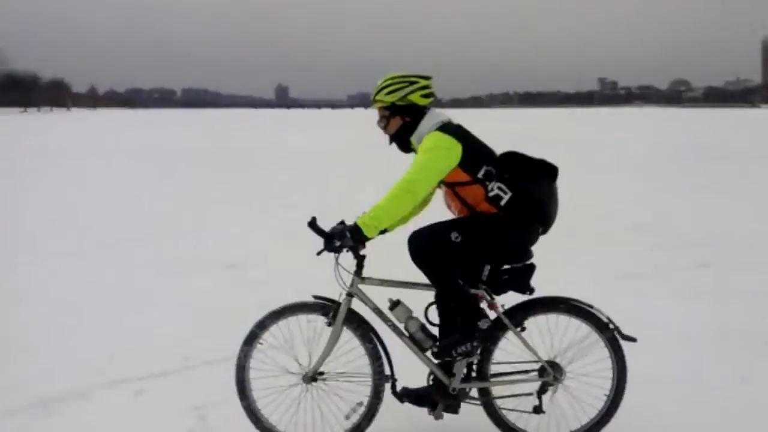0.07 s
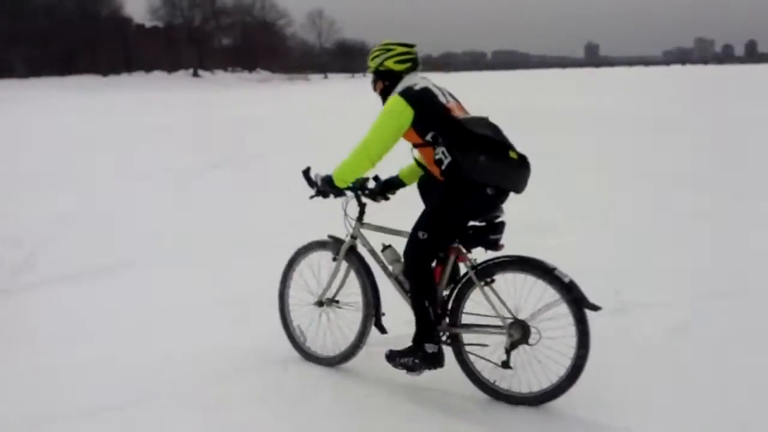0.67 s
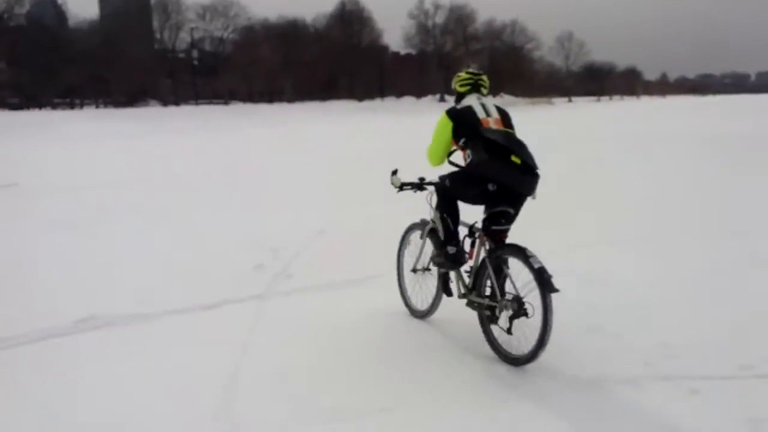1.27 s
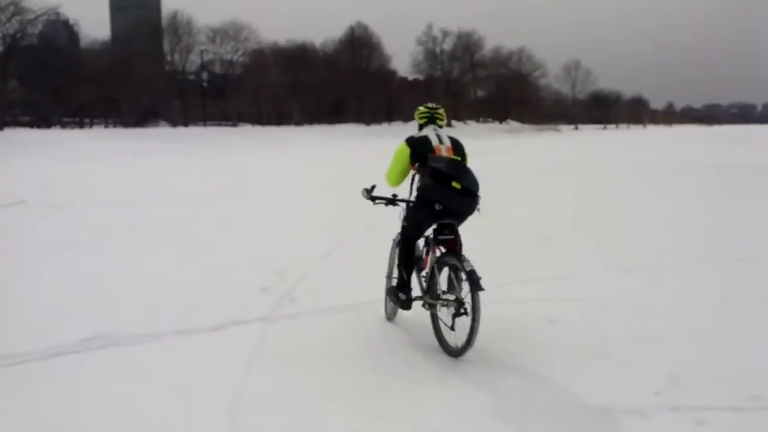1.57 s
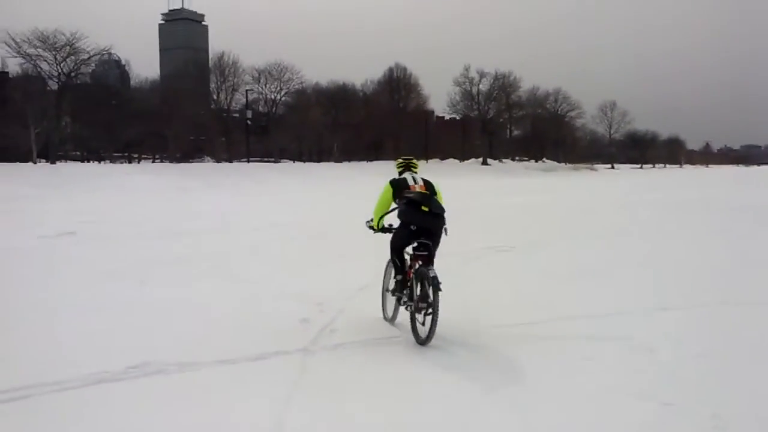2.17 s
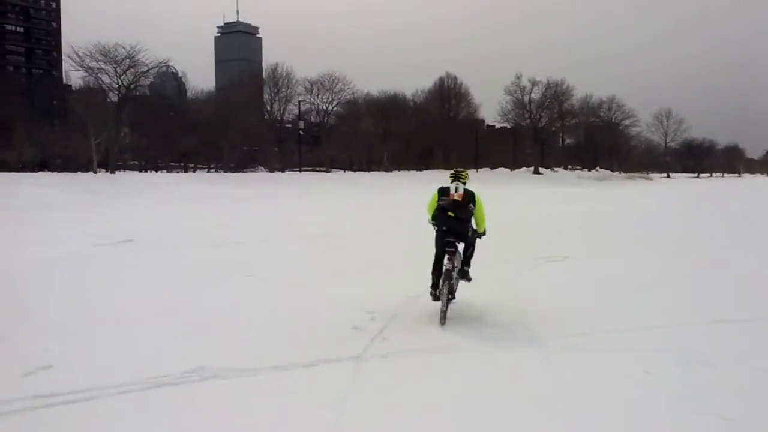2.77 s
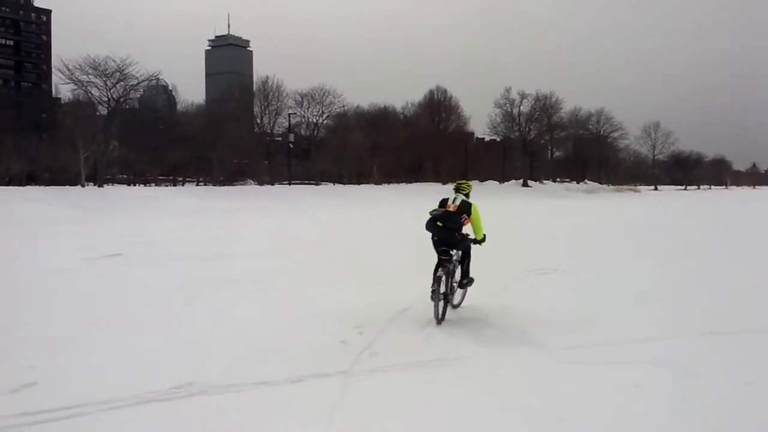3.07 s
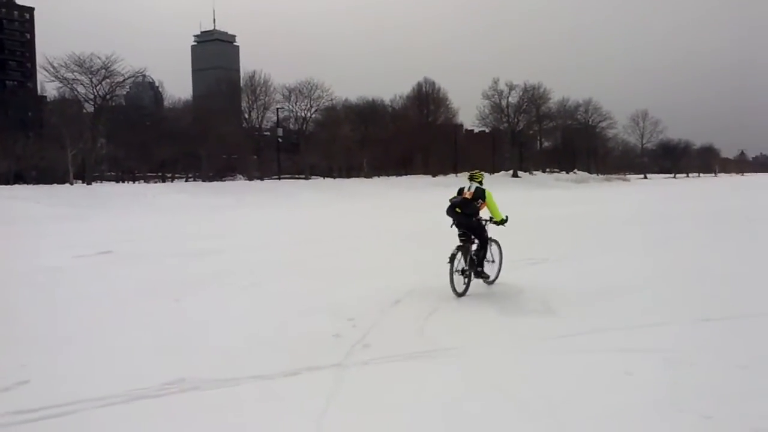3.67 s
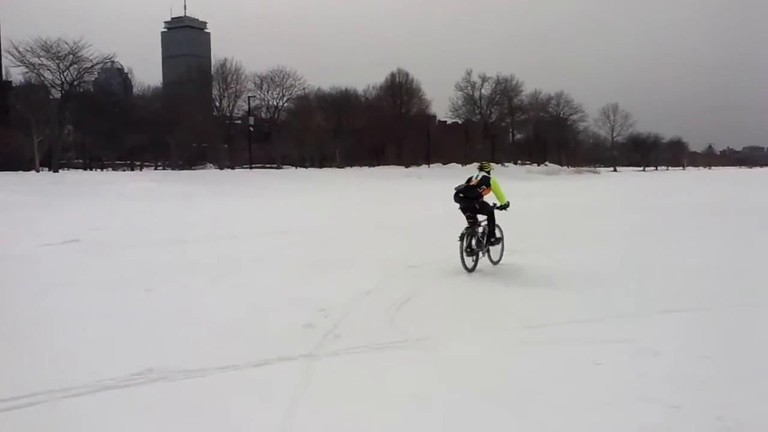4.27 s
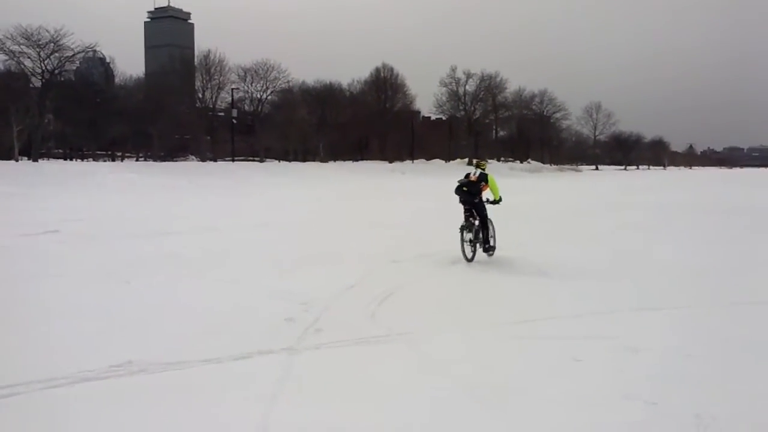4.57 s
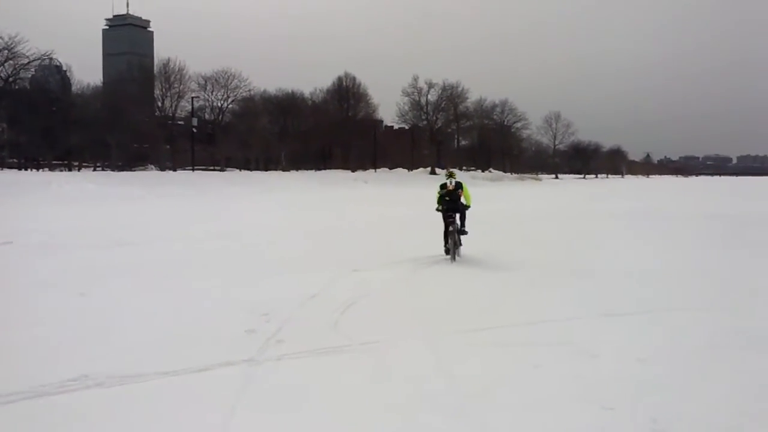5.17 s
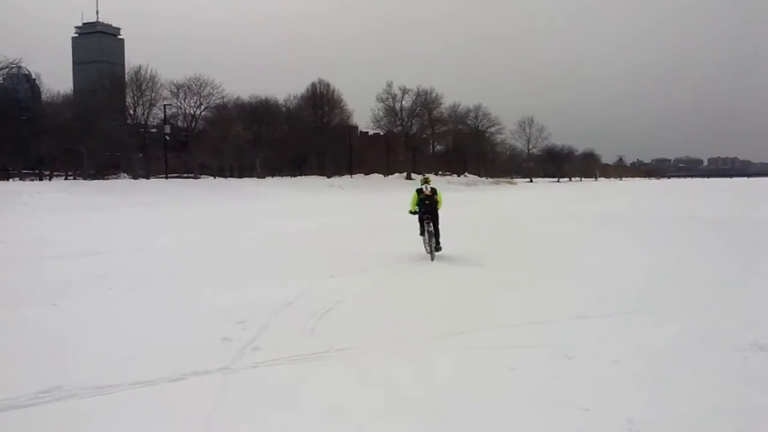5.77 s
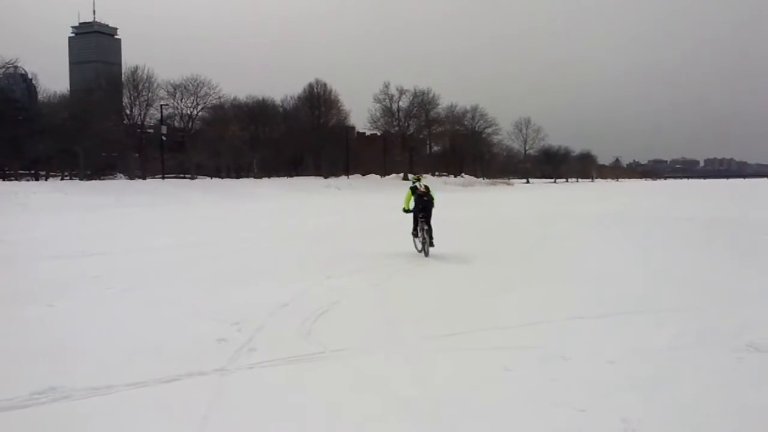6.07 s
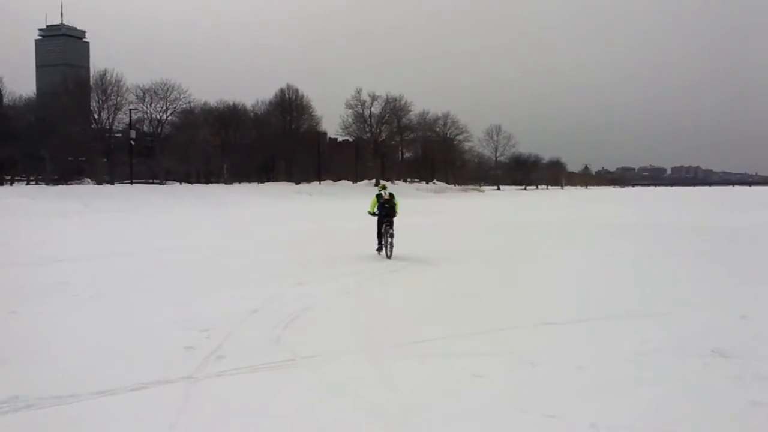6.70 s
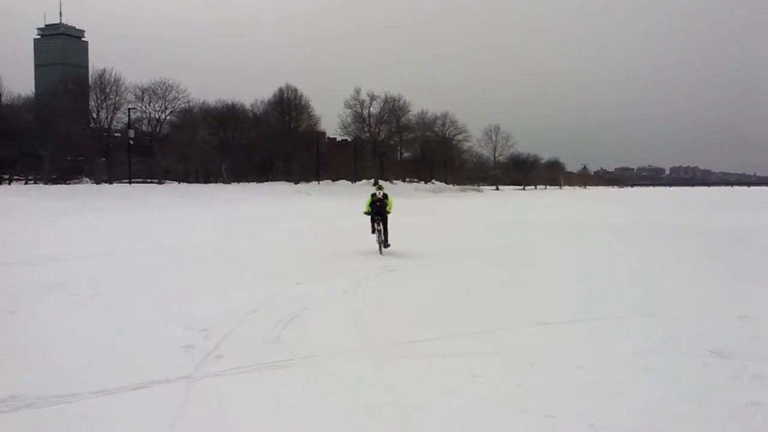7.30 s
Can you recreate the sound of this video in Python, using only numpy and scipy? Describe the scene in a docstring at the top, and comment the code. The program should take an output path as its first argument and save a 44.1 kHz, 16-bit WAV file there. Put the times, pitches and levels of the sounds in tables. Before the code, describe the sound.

A bicycle passes about four metres away on snow-covered ice, in open air with no echo. From the start its tyres crunch through the crust with a powdery hiss and many small, sharp snaps of ice, densest in the first two seconds and then fading with distance. A tyre scrapes briefly at about 3.1 seconds, and the crunch flares again around 3.6 and 4.9. Thin metallic ticks come now and then, clearest from 3.4 to 4 and around 6 seconds, with two very faint squeaks near 6.3 and 7.2. Wind rumbles lightly on the microphone at first, then gusts harder from about 2.8 seconds, thumping near 3.8 and 5.3 and slapping hollowly at 6.2 and 6.6; it dominates until the end, just after 7 seconds. Distant traffic makes a steady wash throughout, and a faint low drone swells around 2 to 2.5 and 5.4 seconds.

```python
"""A bicycle on a frozen, snow-covered river passes four metres from the microphone and rides away.
Its tyres crunch through the crust in clumps of tiny fractures, throw up powder, snap bits of ice
and slip once; metal parts tick and squeak now and then. Gusts buffet the microphone more and more,
over the steady wash of a distant city and a low drone that comes and goes."""
import sys
import numpy as np
from scipy import signal
from scipy.fft import rfft, irfft
from scipy.io import wavfile

SR = 44100
rng = np.random.default_rng(int(sys.argv[2]) if len(sys.argv) > 2 else 0)


def store_wav(level_fs):
    """Save 16-bit WAV to argv[1]."""
    pcm = np.round(np.clip(np.atleast_2d(level_fs), -1, 1) * 32767)
    wavfile.write(sys.argv[1], SR, pcm.T.astype(np.int16))


N = 323694


def from_db(db):
    return 10 ** (np.asarray(db) / 20)


def rms_one(x):
    return x / np.sqrt(np.mean(x ** 2) + 1e-20)


def peak_one(x):
    return x / (np.abs(x).max() + 1e-20)


def add(out, s, sound):
    """Mixes a short sound into out, starting at s seconds."""
    part = out[max(round(s * SR), 0):][:len(sound)]
    part += sound[:len(part)]


def in_time(rows):
    """Each column of a curve, sample by sample."""
    s, *columns = np.transpose(rows)
    return [np.interp(np.arange(N) / SR, s, c) for c in columns]


def swell(middle, width):
    """A smooth rise and fall of height 1."""
    return np.exp(-((np.arange(N) / SR - middle) / width) ** 2)


def patch(start, length, attack_s=0.03, release_s=0.05):
    """Attack, hold and release as a tyre runs through a patch of snow; height 1."""
    t = np.arange(N) / SR - start
    return np.clip(.5 + np.minimum(t / attack_s, (length - t) / release_s), 0, 1)


def drift(rate):
    """A random wander through `rate` points a second; rms 1."""
    knots = rng.standard_normal(N // 20)
    return rms_one(np.interp(np.arange(N) / SR * rate, np.arange(len(knots)), knots))


def grains(per_s, spread_db):
    """Random clicks of uneven size; rms 1."""
    sizes = from_db(spread_db * np.minimum(rng.exponential(1, N), 4)) * rng.choice([-1, 1], N)
    return rms_one(sizes * (rng.random(N) < per_s / SR))


def burst(t60):
    """A dying cluster of micro-contacts; energy 1."""
    t = np.arange(N // 100) / SR
    cluster = rng.standard_normal(len(t)) * from_db(-60 * t / t60)
    return cluster / np.linalg.norm(cluster)


def ring(clicks, hz, t60):
    """A unit click sets a sine of height 1 ringing."""
    r, w = from_db(-60 / (t60 * SR)), 2 * np.pi * hz / SR
    return signal.lfilter([0, np.sin(w)], [1, -2 * r * np.cos(w), r * r], clicks + 1e-18)


def around(x, hz, octaves):
    """A broad resonance centred on hz."""
    edges = np.clip(hz * 2 ** (octaves * np.array([-.5, .5])), 20, SR / 2 - 1)
    return signal.sosfilt(signal.butter(2, edges, "band", fs=SR, output="sos"), x + 1e-18)


def coloured(x, spectrum):
    """Gives x a spectrum with a causal filter, so that clicks keep their sharp front; rms 1."""
    hz, db = np.transpose(spectrum)
    bins = np.maximum(np.fft.rfftfreq(N, 1 / SR), 1)
    gain = from_db(np.interp(np.log(bins), np.log(hz), db))
    cepstrum = irfft(np.log(gain), N)
    minimum_phase = np.exp(2 * rfft(cepstrum[:N // 2], N))
    return rms_one(irfft(rfft(x) * minimum_phase, N))


def distance_db(closest_m=3.97, closest_s=0.21, speed_m_per_s=3.44):
    """A straight ride past the microphone: 0 dB when closest, falling as one over the distance."""
    along_m = speed_m_per_s * (np.arange(N) / SR - closest_s)
    return -20 * np.log10(np.hypot(1, along_m / closest_m))


def dips_db():
    """How far the tyre noise sinks in its brief dips."""
    # Each row: middle in seconds, half width in seconds, depth in dB.
    dips = [(0.795, 0.042, 4.5), (1.39, 0.038, 2), (1.845, 0.018, 4.5), (2.03, 0.068, 4), (2.27, 0.04, 3.5),
            (2.58, 0.079, 3), (2.99, 0.078, 6)]
    return sum(db * swell(s, width) for s, width, db in dips)


def tyre_levels():
    """Crunch, powder and tread in dB: fading with distance, louder in deep snow, uneven with the crust."""
    # Patches of deeper snow. Each row: start and length in seconds, extra crunch and extra powder in dB.
    bites = [(0.05, 1.27, 2, 5.5), (0.1, 0.24, 2, 2), (1.168, 0.21, 3.5, 1.5), (2.352, 0.15, 2.5, 3.5),
             (2.646, 0.26, 3, 2.5), (3.072, 0.36, 5, 5.5), (3.095, 0.2, 4, 2.5), (3.428, 0.61, 1.5, 2.5),
             (3.618, 0.1, 9.5, 8.5), (4.65, 0.14, 6, 2.5), (4.875, 0.17, 8.5, 8.5), (6.27, 0.12, 2.5, 3),
             (6.57, 0.19, 3.5, 2.5)]
    far_db = distance_db()
    ground_db = 0.8 * drift(rate=28) - dips_db()
    bite_db = sum(db * patch(s, length) for s, length, db, _ in bites)
    spray_db = sum(db * patch(s, length) for s, length, _, db in bites)
    # each layer fades with distance at its own rate
    crunch_db = -42 + 0.72 * far_db + ground_db + bite_db
    powder_db = -48 + 0.31 * far_db + ground_db + spray_db
    tread_db = -43.5 + 1.09 * far_db + ground_db + 0.99 * bite_db
    return crunch_db, powder_db, tread_db


def tyres():
    """The crust fails in clumps of tiny fractures; each clump also throws up hissing powder."""
    # The river's surface under the tyres. Each row: time in seconds, share of hard ice from 0 to 1.
    hardness = [(0, 0.2), (1.2, 0.05), (1.7, 0.12), (3.25, 0.02), (3.65, 0.75), (4.3, 1), (4.8, 0.54),
                (7.34, 0.08)]
    # Spectra of packed snow, hard ice, powder and tread. Each row: frequency in Hz, relative level in dB.
    snow_spectrum = [(600, -29.5), (1300, -1.5), (1900, -10), (2250, -1.5), (2900, -5), (3500, -4),
                     (4200, -6.5), (5300, -14.5), (9000, -32.5)]
    ice_spectrum = [(1000, -22), (1900, -28.5), (2300, -7), (2900, -11.5), (3400, -6), (4300, -5),
                    (4900, -11), (9000, -19.5)]
    powder_spectrum = [(2000, -22.5), (3200, 0.5), (4200, 11.5), (5200, 7), (7000, 3), (9000, 5.5),
                       (10300, -4)]
    tread_spectrum = [(150, -2), (350, 0.5), (580, 0), (850, 3), (1300, -1.5), (1700, -1), (2100, 0.5),
                      (2700, -3), (5000, -30)]
    crunch_db, powder_db, tread_db = tyre_levels()
    hard = np.clip(in_time(hardness)[0], 0, 1)
    clumps = from_db(1.03 * drift(rate=90))
    fractures = grains(per_s=5000 * clumps, spread_db=2.0) * clumps
    crystals = grains(per_s=16000, spread_db=4.0) * clumps
    # the tread knobs scrub finely and now and then pop through a lump
    knobs = grains(per_s=9000, spread_db=2.0) + 0.96 * grains(per_s=900, spread_db=6.0)
    # hard ice breaks at a higher pitch than packed snow
    crunch = np.sqrt(1 - hard) * coloured(fractures, snow_spectrum)
    crunch += np.sqrt(hard) * coloured(grains(per_s=4000, spread_db=5.0) * clumps, ice_spectrum)
    powder = from_db(powder_db) * coloured(crystals + 0.89 * fractures, powder_spectrum)
    tread = from_db(tread_db) * coloured(knobs, tread_spectrum)
    return from_db(crunch_db) * crunch + powder + tread


def small_snaps(per_s=140, cycles=4.1):
    """Lesser bits of ice break softly at random, at six pitches, and fade as the bicycle rides off."""
    pitches = np.geomspace(2000, 4200, num=6)
    rings = sum(ring(grains(per_s / len(pitches), spread_db=1.2), hz, cycles / hz) for hz in pitches)
    level_db = -45 + 0.95 * distance_db() - dips_db()
    return from_db(level_db) * rms_one(around(rings, hz=2980, octaves=1.84))


def turbulence(spectrum, lumpy_db, rate):
    """Noise that swells and sags as eddies pass."""
    return coloured(rng.standard_normal(N) * from_db(lumpy_db * drift(rate)), spectrum)


def wind(steepness=0.25):
    """Wind right on the microphone: large eddies rumble, small fast ones flutter, and a few gusts thump."""
    # The wind's strength. Each row: time in seconds, rumble in dB, small eddies in dB.
    gusts = [(0.0, -44, -47.5), (0.55, -44, -49.5), (1.24, -42, -42.5), (1.39, -48.5, -51),
             (1.66, -42.5, -46), (1.76, -53, -51.5), (2.11, -45.5, -44), (2.55, -39, -37.5),
             (2.64, -38, -43), (2.82, -29.5, -39), (3.27, -34, -36), (3.7, -28, -42.5), (3.72, -37, -45),
             (3.76, -23.5, -32.5), (3.9, -31, -47), (4.05, -29, -40), (4.09, -30.5, -48),
             (4.46, -49, -50.5), (4.72, -36.5, -44), (5.13, -38, -45.5), (5.23, -34.5, -37.5),
             (5.42, -31.5, -37.5), (5.53, -35, -37), (5.72, -26, -30), (5.95, -34.5, -32.5),
             (6.15, -26.5, -26.5), (6.33, -34.5, -33.5), (6.43, -33.5, -28), (6.62, -29, -32.5),
             (6.88, -34, -34.5), (7.34, -31, -32)]
    # Spectra of the large and the small eddies. Each row: frequency in Hz, relative level in dB.
    rumble_spectrum = [(12, -15), (25, -8), (50, -1.5), (85, 0.5), (130, -1), (200, -6), (300, -17),
                       (500, -26.5), (900, -100.5)]
    eddy_spectrum = [(90, -32), (180, 0), (300, 2.5), (420, -1), (600, -7.5), (900, -13), (1400, -26),
                     (2200, -39.5), (5000, -78)]
    # Sharp buffets. Each row: start in seconds, peak in dB, pitch in Hz, length in seconds.
    buffets = [(0.0, -32, 172, 0.03), (0.178, -31.5, 134, 0.026), (0.24, -28.5, 60.7, 0.046),
               (0.255, -30, 191, 0.029), (1.021, -34, 97, 0.043), (1.336, -29.5, 102, 0.041),
               (1.47, -32, 104, 0.038), (2.148, -26, 140, 0.037), (2.858, -20.5, 124, 0.024),
               (3.759, -18, 84.5, 0.027), (5.312, -16.5, 113, 0.025), (5.415, -19, 115, 0.018),
               (5.799, -18, 232, 0.0056)]
    rumble_db, eddy_db = in_time(gusts)
    out = from_db(rumble_db) * turbulence(rumble_spectrum, lumpy_db=1.0, rate=33)
    out += from_db(eddy_db) * turbulence(eddy_spectrum, lumpy_db=2.5, rate=70)
    for s, db, hz, length in buffets:
        t = np.arange(N) / SR - s
        phase = 2 * np.pi * hz * t
        swing = np.sin(phase + steepness * np.sin(phase))   # the pressure rises faster than it falls
        envelope = np.sin(np.pi * np.clip(t / length, 0, 1)) ** 2
        out += from_db(db) * envelope * swing
    return out


def city(level_db=-43):
    """Far traffic, smoothed by distance, under a faint steady hiss."""
    # The city as heard from the river. Each row: frequency in Hz, relative level in dB.
    spectrum = [(100, 5.5), (300, -2.5), (550, -5.5), (720, 5), (880, 7), (1050, 4), (1250, 0),
                (1500, -1.5), (1900, -10), (3000, -39), (4200, -24), (5500, -51), (10000, -41)]
    return from_db(level_db) * coloured(rng.standard_normal(N), spectrum)


def crackles(trim_db=-5.0):
    """Pieces of crust collapse, each in a quick swarm of fractures with a pitch of its own."""
    # Each row: middle and half width in seconds, level in dB before the trim, pitch in Hz.
    collapses = [(0.118, 0.0096, -33.5, 3160), (0.161, 0.023, -30, 2830), (0.236, 0.006, -32, 2190),
                 (0.517, 0.0078, -33.5, 2240), (0.728, 0.0059, -30.5, 1750), (0.968, 0.006, -32, 1800),
                 (1.24, 0.007, -33, 2200), (1.451, 0.0074, -34, 2500), (1.473, 0.0081, -36, 2600),
                 (1.587, 0.017, -34.5, 2620), (1.65, 0.023, -39, 3050), (1.886, 0.0067, -31, 2780),
                 (2.159, 0.0037, -32, 2780), (2.696, 0.0076, -32.5, 3420), (3.645, 0.014, -34, 3400),
                 (3.682, 0.02, -31, 3200), (4.278, 0.0054, -43, 3020)]
    fractures = grains(per_s=1500, spread_db=1.0)
    return sum(from_db(db + trim_db) * rms_one(around(fractures, hz, octaves=0.87)) * swell(s, width)
               for s, width, db, hz in collapses)


def ice_snaps(crumble_db=-9, crumble_s=0.014):
    """Ice snaps under a tyre: one sharp break, over in about two cycles, followed by a few crumbs."""
    # Each row: start in seconds, peak in dB, pitch in Hz.
    snaps = [(0.1635, -21, 3300), (0.2358, -22, 2200), (0.2754, -20.5, 1690), (0.286, -24, 2300),
             (0.311, -27, 1700), (0.4725, -28, 1430), (0.682, -21, 2000), (0.7257, -22, 1420),
             (0.9685, -30, 2200), (0.983, -32, 2400), (1.1207, -24, 1550), (1.267, -25, 2300),
             (1.331, -22, 2200), (1.3848, -36, 1300), (1.4185, -32, 2430), (1.4763, -27, 2300),
             (1.4794, -19.5, 2450), (1.578, -33, 2550), (1.607, -19, 1620), (1.6467, -20, 3120),
             (1.8195, -26.5, 2800), (1.8875, -24.5, 2590), (2.135, -30, 2300), (2.1525, -22.5, 2840),
             (2.2418, -27.5, 2020), (2.695, -27, 2600), (2.855, -31, 2550), (2.891, -25.5, 1980),
             (3.091, -28, 3400), (3.145, -24, 2300), (3.426, -32, 2800), (3.4627, -28.5, 2350),
             (3.622, -29, 3300), (3.823, -25, 3000), (4.087, -33, 4100), (4.203, -25, 4200),
             (4.2762, -25, 3020), (4.347, -32, 3400), (5.285, -30, 3800)]
    out = np.zeros(N)
    for s, db, hz in snaps:
        push = from_db(crumble_db) * burst(crumble_s)
        push[0] += 1   # the break itself
        add(out, s, from_db(db) * peak_one(around(push, hz, octaves=1.07)))
    return out


def drone(hz=135, t60=0.074, half_width_s=0.19):
    """A low, narrow drone swells up and dies away: noise in one resonance."""
    # Each row: middle of a swell in seconds, its level there in dB.
    swells = [(1.45, -48), (2.15, -39.5), (2.55, -39), (5.38, -35)]
    level = sum(from_db(db) * swell(s, half_width_s) for s, db in swells)
    return level * rms_one(ring(rng.standard_normal(N), hz, t60))


def metal_ticks(contact_s=0.0022, part_db=-5, part_t60=0.016, crack_s=0.0025):
    """A short rattling contact cracks, and rings a small part of the bicycle and the metal around it."""
    # Each row: start in seconds, peak in dB before the high-pass, the part's own ring in Hz.
    ticks = [(1.8125, -30, 7600), (1.911, -38, 7800), (2.927, -39, 7400), (3.373, -27, 8700),
             (3.571, -40, 7460), (3.675, -22, 8400), (3.999, -18.5, 8780), (5.855, -21.5, 9370),
             (5.988, -28, 9150), (6.2605, -36, 4400), (6.3058, -20.5, 9940), (6.313, -18.5, 8600),
             (6.628, -31, 8200), (6.637, -31.5, 8000), (7.041, -40, 5400)]
    # Modes of the surrounding metal. Each row: frequency in Hz, relative level in dB, t60 in seconds.
    metal_modes = [(4170, -4, 0.019), (4630, -13, 0.0038), (5450, -3.5, 0.0073), (6560, -1, 0.0042),
                   (7540, -8, 0.0068), (8700, -6, 0.019), (9200, -9, 0.0096), (9810, -2.5, 0.02)]
    out = np.zeros(N)
    for s, db, part_hz in ticks:
        modes = list(metal_modes) + [(part_hz, part_db, part_t60)]
        tick = sum(from_db(mode_db) * peak_one(ring(burst(contact_s), hz, t60))
                   for hz, mode_db, t60 in modes)
        crack = peak_one(around(burst(crack_s), hz=9500, octaves=0.52))
        add(out, s, from_db(db) * peak_one(tick + crack))
    return signal.sosfilt(signal.butter(2, 3500, "high", fs=SR, output="sos"), out)


def skid(start_s=3.142, length_s=0.1, level_db=-40.5):
    """A tyre slides sideways on packed snow: stick and slip so dense that it merges into one scrape."""
    scrape = around(grains(per_s=9000, spread_db=2.5), hz=2730, octaves=0.46)
    return from_db(level_db) * patch(start_s, length_s) * rms_one(scrape)


def knocks(overtone_db=-17):
    """The hardest buffets slap the microphone and ring hollow for a few cycles."""
    # Each row: start in seconds, peak in dB, pitch in Hz, t60 in seconds.
    slaps = [(6.2139, -15.5, 880, 0.012), (6.6042, -14.5, 540, 0.015)]
    out, t = np.zeros(N), np.arange(N // 100) / SR
    for s, db, hz, t60 in slaps:
        phase = 2 * np.pi * hz * t
        swing = np.sin(phase) + from_db(overtone_db) * np.sin(2 * phase)
        envelope = np.minimum(hz * t, 1) * from_db(-60 * t / t60)
        add(out, s, from_db(db) * peak_one(swing * envelope))
    return out


def squeaks():
    """A rubbing part of the bicycle, far off by now, sings faintly in a narrow band."""
    # Each row: middle and half width in seconds, level in dB, pitch in Hz.
    rubs = [(6.268, 0.017, -47, 4320), (7.19, 0.026, -50, 4160)]
    friction = rng.standard_normal(N)
    return sum(from_db(db) * swell(s, width) * rms_one(around(friction, hz, octaves=0.22))
               for s, width, db, hz in rubs)


def scene():
    """One microphone out on the open ice, which gives no echo: all sounds arrive dry."""
    air = wind() + knocks()
    snow_and_ice = tyres() + skid() + ice_snaps() + crackles() + small_snaps()
    bicycle_parts = metal_ticks() + squeaks()
    return (air + snow_and_ice + bicycle_parts + city() + drone())[None]


def record(dry, cutoff_hz=10400):
    """The treble is cut steeply."""
    return signal.sosfilt(signal.ellip(10, .2, 80, cutoff_hz, fs=SR, output="sos"), dry)


dry = scene()
out = record(dry)
store_wav(out)
```